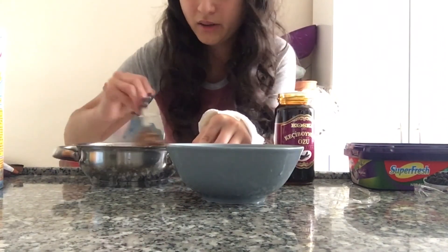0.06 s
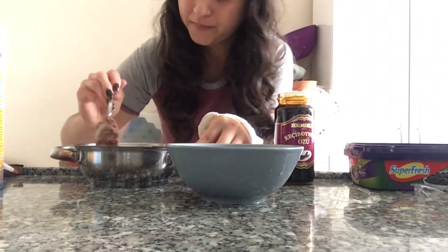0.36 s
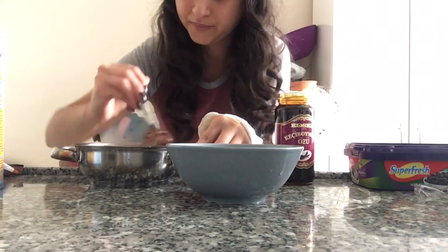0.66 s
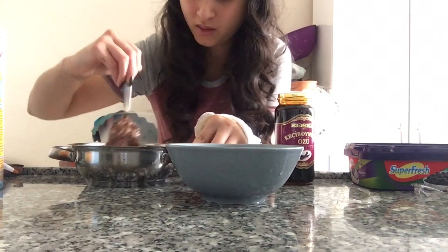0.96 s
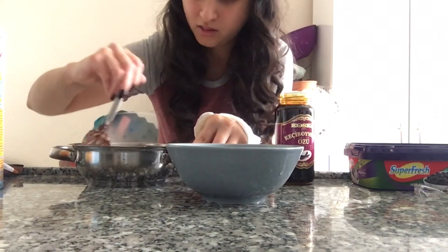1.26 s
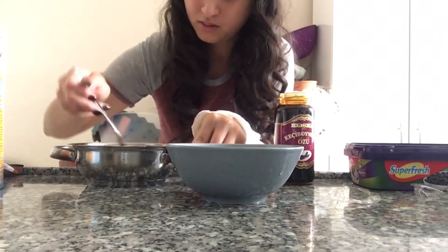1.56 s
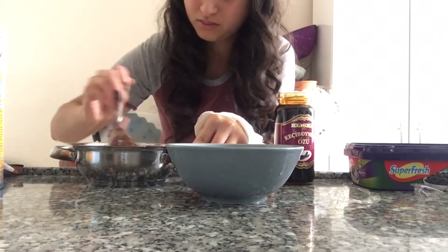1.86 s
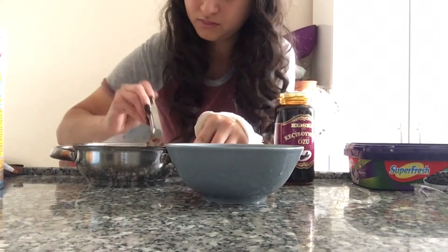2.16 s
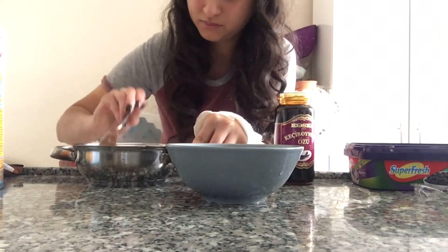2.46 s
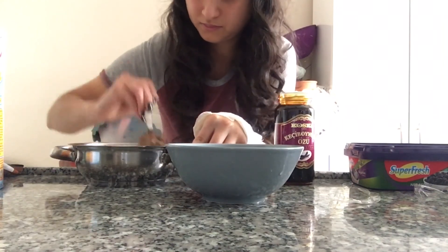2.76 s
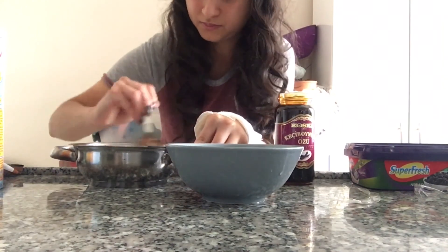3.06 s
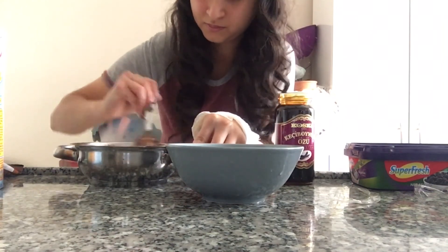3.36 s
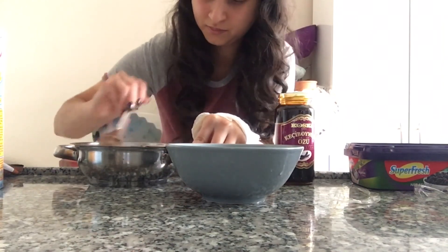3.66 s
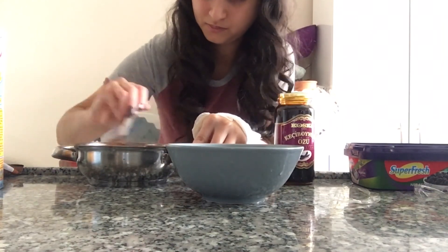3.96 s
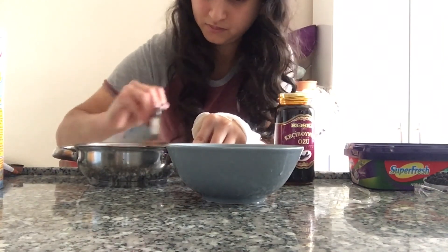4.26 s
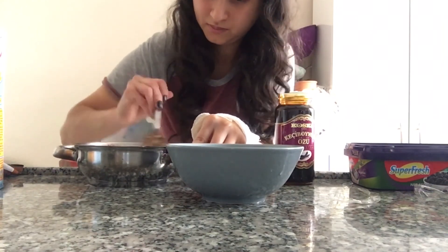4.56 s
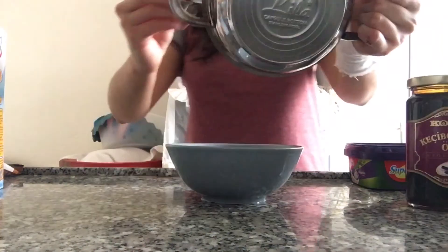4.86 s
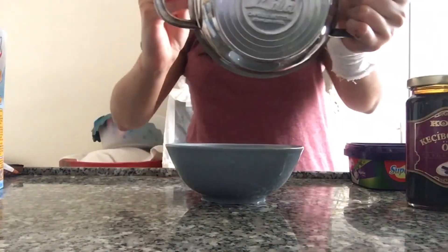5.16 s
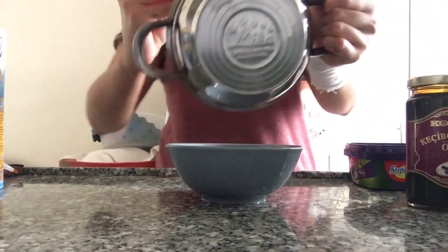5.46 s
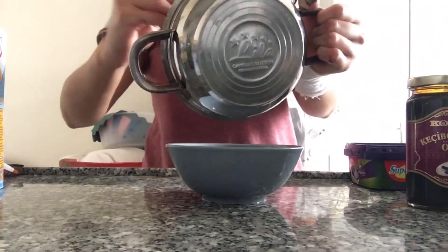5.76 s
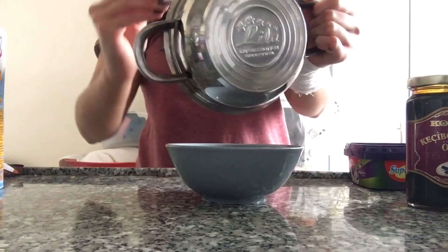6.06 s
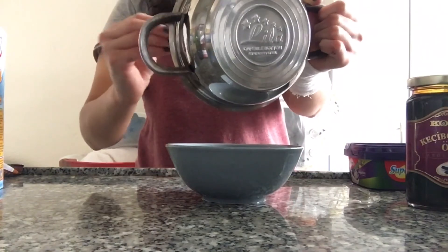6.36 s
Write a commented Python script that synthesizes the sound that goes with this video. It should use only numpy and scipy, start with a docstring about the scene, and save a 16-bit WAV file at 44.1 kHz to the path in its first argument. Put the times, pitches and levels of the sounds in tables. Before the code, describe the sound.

Thick porridge is stirred with uneven clanks and short scrapes of spoon on steel pot, followed by softer taps and scraping.

```python
"""A steel spoon stirs thick porridge in a steel pot on a stone counter in a small kitchen. Impacts excite the
modes of pot and spoon, and the porridge damps the wall's ring. Stick-slip friction drives the wall's resonances
as the spoon scrapes; the mass churns softly in between. Then the scene changes: the pot is held tilted in the
air and scraped out over a bowl, ringing with a different set of modes. Knocks and scrapes reverberate briefly
over a faint, low room tone."""
import sys
import numpy as np
from scipy import signal
from scipy.fft import rfft, irfft
from scipy.io import wavfile

SR = 44100
rng = np.random.default_rng(int(sys.argv[2]) if len(sys.argv) > 2 else 0)


def wav_record(signal):
    """Record a signal, one row per channel, as 16-bit PCM in the file named by sys.argv[1]."""
    frames = np.transpose(np.atleast_2d(signal))
    bounded = np.clip(frames, -1, 1)
    # unit amplitude maps onto the largest positive 16-bit level
    quanta = np.round(bounded * 32767).astype(np.int16)
    wavfile.write(sys.argv[1], SR, quanta)


N = 291844
TIME = np.arange(N) / SR
CUT_S = 4.777  # the scene changes: stirring ends, scraping out begins


def amp(db):
    """Decibels as an amplitude ratio."""
    return 10 ** (np.asarray(db) / 20)


def unit(x):
    """Normalisation to an rms of one."""
    return x / np.sqrt(np.mean(x ** 2) + 1e-20)


def read(points, hz):
    """Interpolation on a log-frequency axis."""
    f, value = np.transpose(points)
    return np.interp(np.log(hz + 1), np.log(f + 1), value)


def add(mix, start_s, sound):
    """Superposition of a sound on the mix."""
    part = mix[max(round(start_s * SR), 0):][:len(sound)]
    part += sound[:len(part)]


def coloured(x, spectrum):
    """Spectral shaping, at an rms of one."""
    gain = amp(read(spectrum, np.fft.rfftfreq(len(x), 1 / SR)))
    return unit(irfft(rfft(x) * gain, len(x)))


def pulse(gain_at, size=4096):
    """Minimum phase: the sharpest causal pulse with a given spectrum."""
    hz = abs(np.fft.fftfreq(size, 1 / SR))
    log_gain = np.log(np.maximum(gain_at(hz), 1e-5))
    return np.fft.ifft(np.exp(np.conj(signal.hilbert(log_gain)))).real


def clicks(size, per_s, spread_db):
    """A Poisson train of impulses of uneven size, at an rms of one."""
    chance, sign = rng.random(size), rng.choice([-1, 1], size)
    strength = amp(spread_db * np.minimum(rng.exponential(1, size), 4))
    return unit(sign * (chance < per_s / SR) * strength)


# Background spectrum: frequency_hz, gain_db
ROOM_SPECTRUM = [(20, -39), (48, -3), (75, -10.5), (97, 2.5), (125, -1), (160, 0.5), (220, -20),
                 (400, -10.5), (700, -16), (1800, -21), (3000, -27.5), (6000, -34.5), (14000, -41.5),
                 (16000, -64)]
def room_tone(level_db=-60.5):
    """Stationary noise, strongest in the bass."""
    return amp(level_db) * coloured(rng.standard_normal(N), ROOM_SPECTRUM)


# Modes struck by a blow, with the pot on the counter and in the air: pitch_hz, gain_over_blow_db, t60_s; on the
# counter the lowest lines ring in the counter and room, the rest in the filled pot
STANDING_MODES = [(192.3, 4.5, 0.13), (255, -16, 0.28), (317, 10.5, 0.12), (385, 8, 0.091),
                  (536, 3.5, 0.03), (619, 7.5, 0.05), (710, 3.5, 0.065), (885, -2.5, 0.078),
                  (1133, -4, 0.12), (1167, 2.5, 0.03), (1400, 6.5, 0.12), (1686, -5, 0.095),
                  (1757, -0.5, 0.024), (2020, 1, 0.031), (2230, -4, 0.019), (2230, 3, 0.028),
                  (2490, -2.5, 0.16), (2470, -14, 0.27), (3110, -6, 0.046)]
LIFTED_MODES = [(722, 18, 0.028), (1103, 9.5, 0.024), (1397, 18.5, 0.052), (2280, 20, 0.019),
                (3360, -4, 0.029), (4270, 18, 0.013)]
def pot_ring(lifted, scatter_db=3.0, size=10000):
    """Modal impulse response: the blow plus damped modes, whose shares vary with the spot struck."""
    t = np.arange(size) / SR
    hz, db, t60 = np.transpose(LIFTED_MODES if lifted else STANDING_MODES)[:, :, None]
    decay = np.log(1000) / t60
    share = amp(db + scatter_db * rng.standard_normal(db.shape))
    ring = (share * 2 * decay / SR * np.exp(-decay * t) * np.cos(2 * np.pi * hz * t)).sum(0)
    ring[0] += 1
    return ring


def wall_shiver(t60_s, share, size=4096):
    """High modal density: a thin wall smears a blow into quickly decaying noise."""
    tail = rng.standard_normal(size) * amp(-60 * np.arange(size) / SR / t60_s)
    response = share * tail / np.linalg.norm(tail)
    response[0] += 1
    spectrum = rfft(response, 2 * size)
    return irfft(spectrum / np.sqrt(abs(spectrum)))[:size]  # halves the ripple in dB


# Modes of the spoon: pitch_hz, gain_db, t60_s
SPOON_MODES = [(2595, -4, .04), (3080, -8, .03), (3445, -12, .03), (3820, -6, .025), (3927, -1, .045),
               (4340, -7, .02), (4600, -10, .02), (4900, -12, .03), (5604, -23, .13), (5800, -23, .08),
               (5950, -23, .12), (9500, -19, .02)]
def spoon_ring(size, attack_s=0.00081):
    """Free vibration of the spoon: the point of contact sets each mode's share."""
    t = np.arange(size) / SR
    ring = np.zeros(size)
    for hz, db, t60 in SPOON_MODES:
        envelope = amp(db + rng.standard_normal() - 60 * t / t60)
        ring += envelope * np.sin(2 * np.pi * (hz * t + rng.random()))
    return ring * np.minimum(t / attack_s, 1)


# Spectra of the base's thud and the contact tick: frequency_hz, gain_db
THUD_SPECTRUM = [(30, -36.5), (80, 3.5), (170, 4.5), (330, 1.5), (540, 4.5), (700, -8.5), (1000, -24.5),
                 (2500, -36), (16000, -82)]
TICK_SPECTRUM = [(200, -42), (1500, 1.5), (3000, 9), (4500, 8), (6500, -0.5), (9500, -5), (12000, -8),
                 (16000, -16)]
def knock(lifted, thud_db, clank_db, clank_hz, spoon_db, tick_db):
    """Impact excitation: the less porridge cushions the contact, the higher the wall's clank."""
    def force_spectrum(hz):
        low_cut = (hz / (hz + clank_hz)) ** 2.266
        return low_cut / np.sqrt(1 + (hz / (1.123 * clank_hz)) ** 7.3)

    ring = pot_ring(lifted)
    thud = signal.fftconvolve(pulse(lambda hz: amp(read(THUD_SPECTRUM, hz))), ring)
    clank = signal.fftconvolve(pulse(force_spectrum), ring)
    clank = signal.fftconvolve(clank, wall_shiver(t60_s=0.047, share=3.4))
    spoon = spoon_ring(len(ring))
    tick = pulse(lambda hz: amp(read(TICK_SPECTRUM, hz)))
    tick = signal.fftconvolve(tick, wall_shiver(t60_s=0.023, share=2.5))
    sound = np.zeros(2 * len(ring))
    for part, db in (thud, thud_db), (clank, clank_db), (spoon, spoon_db), (tick, tick_db):
        # each part has the energy of its level held for 10 ms
        add(sound, 0, part * amp(db) * np.sqrt(0.01 * SR / np.sum(part ** 2)))
    return sound


# Impacts of spoon on pot: start_s, thud_db, clank_db, clank_hz, spoon_db, tick_db
IMPACTS = [(0.0107, -33.5, -28, 920, -49.5, -51), (0.039, -37.5, -31.5, 1480, -44, -57),
           (0.3844, -33, -28.5, 1060, -48, -45.5), (0.7233, -35, -38.5, 910, -60, -55.5),
           (0.806, -70, -67, 1160, -79, -63), (1.0062, -40, -36.5, 1390, -58, -54),
           (1.2042, -33.5, -41.5, 980, -79, -66), (2.0316, -30.5, -27.5, 1110, -55, -60),
           (2.8581, -36, -24.5, 1320, -30.5, -37), (3.1194, -28.5, -28, 970, -70, -49),
           (3.123, -20.5, -25, 1100, -55, -58), (3.3116, -34, -29, 1060, -53, -50),
           (3.4861, -31.5, -34.5, 780, -75, -63), (3.7619, -33.5, -31, 1110, -63, -51),
           (3.8237, -42.5, -35, 1510, -46.5, -50.5), (3.892, -37.5, -46, 770, -74, -71),
           (4.0855, -50, -36, 1200, -50.5, -68), (4.141, -38.5, -35, 875, -75, -62.5),
           (4.3017, -31, -38, 860, -70, -65), (4.5623, -41.5, -37, 930, -66, -60.5),
           (4.7668, -47, -45.5, 1070, -64, -83), (5.1588, -51.5, -53.5, 1180, -72, -67),
           (5.204, -49.5, -42, 1640, -74, -58), (5.416, -56, -51.5, 1590, -64, -61.5),
           (5.888, -52.5, -46, 950, -61, -60.5), (6.515, -80, -59, 1260, -92, -83)]
def knocks():
    """Impacts superpose on two tracks: pot standing and pot lifted."""
    tracks = np.zeros((2, N))
    for start_s, *contact in IMPACTS:
        lifted = start_s >= CUT_S
        add(tracks[int(lifted)], start_s, knock(lifted, *contact))
    return tracks


# Spectra of churning lumps and snapping films: frequency_hz, gain_db
CHURN_SPECTRUM = [(30, -22), (80, 2.5), (140, -1.5), (320, -3), (600, -22), (1500, -26), (5000, -78),
                  (16000, -70)]
FIZZ_SPECTRUM = [(300, -5.5), (1500, 11), (3000, -0.5), (4700, -4), (6200, -1), (8000, -10), (14000, -24),
                 (16000, -43)]
# Pushes of the spoon through the mass: peak_s, length_s, churn_db, fizz_db
PORRIDGE_PUSHES = [(0.02, 0.21, -49.5, -71), (1.186, 0.45, -54.5, -72), (2.868, 0.28, -48, -87),
                   (3.287, 0.38, -60, -71), (3.6, 0.54, -55.5, -69.5), (3.945, 0.56, -54.5, -75),
                   (4.495, 0.17, -56.5, -86), (4.983, 0.54, -67, -72), (6.146, 0.71, -70, -70)]
def porridge(rest_churn_db=-66, rest_fizz_db=-75):
    """Shot noise: dull lumps churn and small wet films snap, swelling with each push."""
    churn_gain, fizz_gain = amp(rest_churn_db), amp(rest_fizz_db)
    for peak_s, length_s, churn_db, fizz_db in PORRIDGE_PUSHES:
        swell = np.cos(np.pi * np.clip((TIME - peak_s) / length_s, -.5, .5))
        churn_gain = np.hypot(churn_gain, amp(churn_db) * swell)  # powers add
        fizz_gain = np.hypot(fizz_gain, amp(fizz_db) * swell)
    churn = coloured(clicks(N, per_s=170, spread_db=0.5), CHURN_SPECTRUM)
    fizz = coloured(clicks(N, per_s=980, spread_db=-1.5), FIZZ_SPECTRUM)
    return churn * churn_gain + fizz * fizz_gain


# Resonances with the spoon pressed on the wall: pitch_hz, bandwidth_hz, gain_db
STANDING_RESONANCES = [(713, 37, -7), (840, 80, -7), (1191, 53, 10.5), (1430, 240, -8), (1740, 77, -4.5),
                       (2100, 90, -1.5), (2500, 76, -7), (3030, 190, -20), (4090, 125, -17),
                       (6010, 180, -26.5)]
LIFTED_RESONANCES = [(740, 130, 6), (1135, 100, 8), (1389, 44, 16.5), (2300, 100, 5.5), (3400, 150, -11),
                     (3800, 250, -9), (4350, 180, -3.5), (4940, 240, -17), (5800, 820, -23)]
def wall_rasp(slips, lifted, split_hz=1900):
    """Forced vibration: slips drive the wall's lower and upper resonances, each set at an rms of one."""
    t = np.arange(len(slips)) / SR
    bands = np.zeros((2, len(t)))
    for hz, width, db in LIFTED_RESONANCES if lifted else STANDING_RESONANCES:
        envelope = amp(db) * width * np.exp(-np.pi * width * t)
        bands[int(hz >= split_hz)] += envelope * np.sin(2 * np.pi * hz * t)
    return [unit(signal.fftconvolve(slips, ring)[:len(t)]) for ring in bands]


# Spectrum of the friction's gritty hiss: frequency_hz, gain_db
GRIT_SPECTRUM = [(300, -30), (2000, -4), (4300, 0), (6000, -1), (9000, -3), (12000, -3), (15000, -4),
                 (16000, -9)]
def scrape(lifted, length_s, rasp_db, jolt_db, growth_db, bite_db, grit_db):
    """Stick-slip friction: the edge lands with a jolt, then rings the wall and sheds grit as it slips."""
    land_s, jolt_s, release_s = 0.001, 0.0053, 0.0073
    press_db, bite_fall_db = 5, 11
    t = np.arange(0, length_s, 1 / SR)
    along = t / length_s - .5  # zero at mid-stroke
    contact = np.clip(np.minimum(t / land_s, (length_s - t) / release_s), 0, 1)
    slack_db = press_db * (1 - np.cos(np.pi * along))  # pressure eases towards both ends
    pressure_db = jolt_db * np.exp(-t / jolt_s) + growth_db * along - slack_db
    slips = clicks(len(t), per_s=870, spread_db=2.5)
    lower, upper = wall_rasp(slips, lifted)
    bite = amp(bite_db - bite_fall_db * along)  # duller as porridge gathers under the edge
    rasp = amp(rasp_db + pressure_db) * (lower + bite * upper)
    grit = coloured(slips + 0.92 * rng.standard_normal(len(t)), GRIT_SPECTRUM)
    return (rasp + amp(grit_db - slack_db) * grit) * contact


# Strokes over the steel: start_s, length_s, rasp_db, jolt_db, growth_db, bite_db, grit_db
STROKES = [(0.448, 0.05, -47.5, -2, 6, -5, -66), (0.555, .11, -45.5, 13.5, 13, -8.5, -63),
           (1.121, 0.033, -58.5, 4, -3, -9.5, -77), (1.168, 0.029, -52.5, 2, -7, -12, -79),
           (1.448, 0.07, -43.5, 11, -2, -11.5, -61), (3.2555, 0.048, -46, 3, -9, -1, -72),
           (5.26, .04, -54.5, 8, -5.5, -4.5, -87), (5.292, 0.015, -64, -1, -2, 5, -55),
           (5.918, 0.13, -52.5, -4, 6.5, -2, -75), (6.086, .12, -59.5, 4, 11, 3.5, -80)]
def scrapes():
    """Friction strokes superpose on two tracks: pot standing and pot lifted."""
    tracks = np.zeros((2, N))
    for start_s, *stroke in STROKES:
        lifted = start_s >= CUT_S
        add(tracks[int(lifted)], start_s, scrape(lifted, *stroke))
    return tracks


# Reverberation times: frequency_hz, t60_s
KITCHEN_DECAY = [(100, 0.59), (300, 0.39), (700, 0.23), (2000, 0.25), (5000, 0.2), (14000, 0.21)]
# Echoes from counter, bowl and wall: arrival_s, gain_over_direct
EARLY_REFLECTIONS = [(.0018, .15), (.0054, .25), (.0096, .14), (.0156, .25), (.0258, .16)]
def kitchen(x, wet_db=-7.0, build_s=0.0054, direct_s=0.00072):
    """Reverberation: direct sound, early reflections, then a short diffuse tail."""
    hz, t, noise = signal.stft(rng.standard_normal(SR // 2), SR, nperseg=256)
    decay = amp(-60 * t / read(KITCHEN_DECAY, hz)[:, None])
    tail = signal.istft(noise * decay, SR)[1]
    tail *= 1 - np.exp(-(np.arange(len(tail)) / SR / build_s) ** 2)
    response = amp(wet_db) * tail / np.linalg.norm(tail)
    for arrival_s, gain in [(direct_s, 1)] + EARLY_REFLECTIONS:
        add(response, arrival_s, np.array([gain]))
    return signal.fftconvolve(x, response / np.linalg.norm(response))[:N]


def scene(fall_s=0.00078, recover_s=0.016):
    """Superposition of all sources: stirring stops dead, the level dips briefly, scraping out follows."""
    standing, lifted = knocks() + scrapes()
    background = room_tone()
    stirring = kitchen(standing) * (TIME < CUT_S)
    mix = stirring + kitchen(lifted) + porridge() + background
    since_cut = TIME - CUT_S
    dip = np.clip(np.maximum(-since_cut / fall_s, since_cut / recover_s), 0, 1) ** 2
    return (mix * dip)[None]


def record(dry, cutoff_hz=15700):
    """Band limiting: a linear-phase low-pass removes the highest treble."""
    low_pass = signal.firwin(401, cutoff_hz, window=("kaiser", 8), fs=SR)
    return signal.oaconvolve(dry, low_pass[None], "same")


dry = scene()
out = record(dry)
wav_record(out)
```